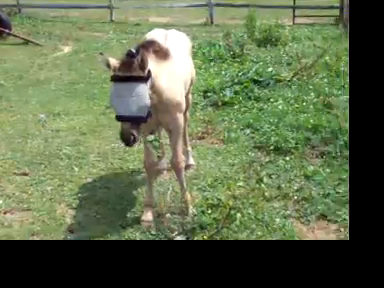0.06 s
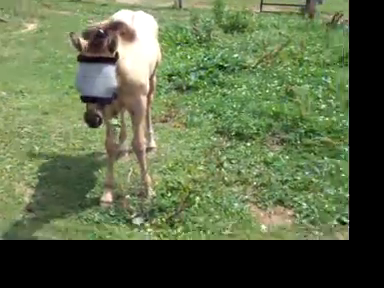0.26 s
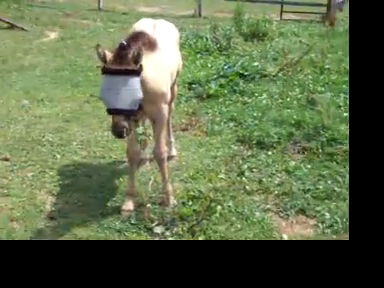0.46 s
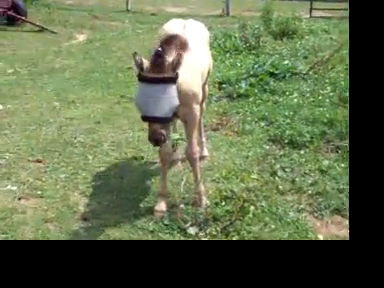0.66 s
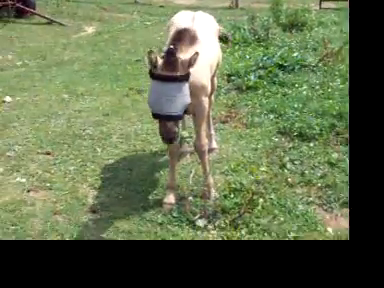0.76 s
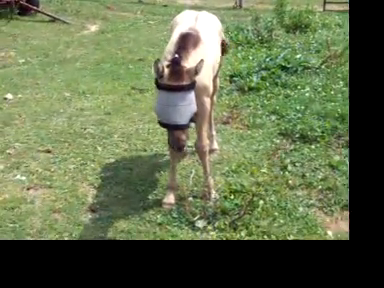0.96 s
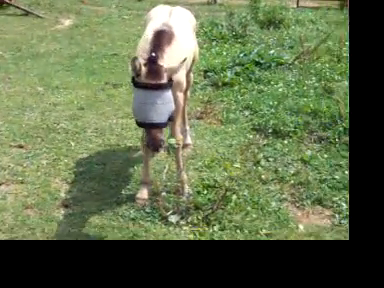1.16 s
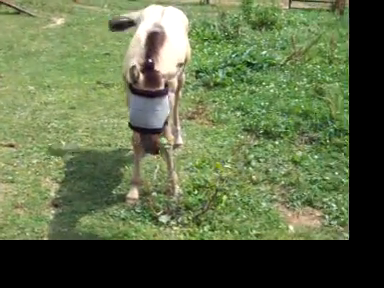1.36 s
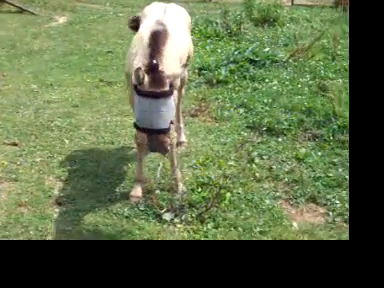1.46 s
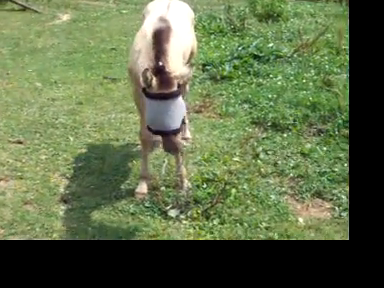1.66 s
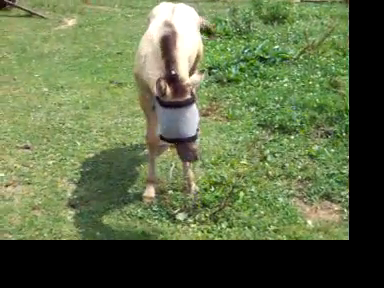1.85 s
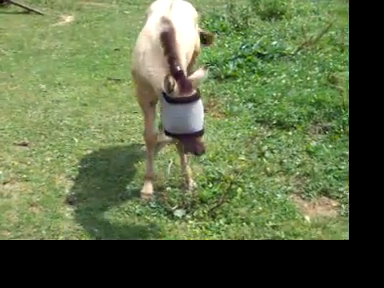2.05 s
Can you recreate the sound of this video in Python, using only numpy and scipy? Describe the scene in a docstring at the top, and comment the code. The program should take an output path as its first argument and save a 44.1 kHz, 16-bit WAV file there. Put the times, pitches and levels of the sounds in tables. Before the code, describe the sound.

Very close handling noise: light ticks, a rapid burst of hard knocks with a gritty rub, one isolated sharp knock. Then quiet open field, faint grass rustle, a twig-like snap and small distant bird chirps.

```python
"""A quiet pasture: air rumble and thin far hiss throughout, grass rustling faintly now and then.
First, light ticks on the microphone case and one short loud scrape among a burst of knocks.
Then a sharp knock and sparse lighter ticks; near the end three arched bird chirps around a dry snap.
Contacts ring damped modes; rubbing and rustles are coloured grains; chirps are gliding sines; air is noise."""
import sys
import numpy as np
from scipy import signal
from scipy.fft import rfft, irfft
from scipy.io import wavfile
from scipy.ndimage import uniform_filter1d

SR = 44100
rng = np.random.default_rng(int(sys.argv[2]) if len(sys.argv) > 2 else 0)


def dump(signal):
    """Clip the signal to [-1, 1] and save it as 16-bit WAV at the path in sys.argv[1]."""
    limited = np.clip(np.atleast_2d(signal).T, -1, 1)
    pcm = np.round(limited * 32767).astype(np.int16)
    wavfile.write(sys.argv[1], SR, pcm)


N = 92610
T = np.arange(N) / SR

# Contacts on the case: start_s, level_db, bass_db, top_db, slide_decay_s, lowpass_hz
CONTACTS = [(0.0518, -25.5, -6, 9.5, .0015, 8100), (0.152, -25, 3, -3, .0005, 4800),
            (0.154, -32, -2, -4, .0005, 4800), (0.2127, -27, 2, 3, .0006, 6500),
            (0.2360, -22, -1, 15, .001, 7150), (0.24, -17, -3.5, -1, 0.0013, 7500),
            (0.2425, -14, -7, -5, 0.0007, 7000), (0.2487, -13, 0, -6, .001, 3000),
            (0.2596, -22.5, 4, 11.5, .001, 7440), (0.2621, -25, 9, 0, .0007, 1000),
            (0.283, -36, -9, 10, .001, 7000), (0.3054, -30.5, -7, 17, .001, 8600),
            (0.311, -16.5, 0, 11.5, .0015, 6500), (0.3336, -16, -11.5, 8, .001, 7000),
            (0.3643, -15.5, 4, 11.5, .0007, 8000), (0.3714, -16.5, 5.5, 1.5, .001, 7060),
            (0.382, -27.5, 11, -5, .001, 4000), (0.567, -39, -3, -6, .002, 6000),
            (0.6232, -11, -5.5, 0, 0.00051, 5000), (0.645, -37.5, 5, 3, .003, 6500),
            (0.669, -32.5, -19, 11, .0005, 7050), (0.988, -41, 10.5, -3, .002, 6000),
            (1.4430, -26, -7, 5.5, .002, 7500), (1.6275, -32, -16, 8, .002, 3800)]
# Ringing modes of the case: mode_hz, mode_db, t60_s
CASE_MODES = [(390, -13.5, 0.0078), (673, -10.5, .014), (1154, -8, 0.015), (1967, -7.5, 0.0091),
              (2567, -8, 0.0097), (3260, -9.5, 0.0098), (4160, -2.5, 0.0079), (5075, -7, 0.0035),
              (6440, -13.5, 0.0051)]
BASS_BELOW_HZ, TOP_ABOVE_HZ, CONTACT_GRIT = 1500, 5000, 0.77

# Dull bumps of the body: start_s, pitch_hz, level_db, t60_s
BODY_BUMPS = [(0.153, 135, -39.5, 0.12), (0.263, 175, -38, .08), (0.3713, 125, -32.5, .11),
              (0.372, 260, -27.5, 0.026), (0.374, 50, -40, .15), (0.381, 817, -31, 0.063),
              (1.443, 400, -35.5, 0.032)]

# Rubbing level over time: time_s, low_band_db, high_band_db
RUB_LEVELS = [(0.225, -67, -65), (0.24, -42, -37), (0.255, -32, -32.5), (0.27, -43.5, -41.5),
              (0.303, -48, -39), (0.311, -27.5, -27), (0.322, -15, -16), (0.34, -23, -20.5),
              (0.361, -20, -19), (0.372, -27.5, -34.5), (0.388, -48, -58), (0.41, -70, -75)]
# Rubbing spectrum: freq_hz, relative_db
RUB_SPECTRUM = [(60, -10.5), (200, -9.5), (400, -5.5), (600, -1.5), (790, 1), (950, -7.5), (1100, 1),
                (1380, 2.5), (1600, -9.5), (2300, -1), (2650, 1.5), (2850, -4), (3300, 0), (3800, -5),
                (4100, -1.5), (5300, -8), (7000, -18), (8500, -35)]
RUB_SPLIT_HZ, SLIPS_PER_S, SLIP_SPREAD_DB, RUB_HISS = 1700, 5000, 2.5, 0.53
HOLLOW_HZ, HOLLOW_T60_S, HOLLOW_DB = 812, .08, -47.5

# Modes of the snap: mode_hz, mode_db, t60_s
SNAP_MODES = [(990, -3.5, 0.016), (2024, 0.5, 0.018), (2840, -5, 0.015), (3500, -8, 0.012),
              (4020, -2.5, 0.017), (6200, -26, 0.0097)]
SNAP_S, SNAP_DB, SNAP_LOWPASS_HZ = 1.8443, -23, 5000

# Bird chirps: peak_s, half_length_s, foot_hz, top_hz, arch_exponent (1 sharp, 2 round), level_db, fade
BIRD_CHIRPS = [(1.764, 0.038, 2850, 3686, 2.6, -47, .7), (1.861, .016, 4050, 6130, 0.8, -43, 0.88),
               (1.923, .016, 3750, 5250, 0.8, -39, 3.0)]
FALL_DB_PER_HALF_LENGTH, CHIRP_WAVER = -4, 0.0116   # waver: rms fraction of the pitch
ECHO_DB, ECHO_T60_S, ECHO_DELAY_S = -6, 0.39, .01

# Soft rustles: centre_s, half_length_s, level_db
RUSTLE_SWELLS = [(0.003, .02, -43), (0.06, 0.029, -38.5), (0.12, 0.034, -52), (0.463, 0.08, -50.5),
                 (0.74, 0.03, -55.5), (1.053, 0.062, -49.5), (1.183, 0.0075, -50), (1.957, 0.093, -51)]
# Rustle spectrum: freq_hz, relative_db
RUSTLE_SPECTRUM = [(200, -6), (800, -3.5), (1600, -6), (2600, 1), (4000, 4), (5400, 3), (7000, -4),
                   (8500, -17.5)]
RUSTLE_GRAINS_PER_S, RUSTLE_SPREAD_DB = 2500, 3

# Open-air spectrum: freq_hz, relative_db
AIR_SPECTRUM = [(12, -53.5), (20, -9.5), (54, 1.5), (92, 0), (127, 2.5), (294, -2.5), (410, -6), (584, -7),
                (1250, -13.5), (1530, -11.5), (2420, -17.5), (3450, -18), (3920, -19.5), (4680, -13),
                (5310, -20), (7970, -30), (8600, -58), (11200, -84.5), (18900, -120)]
AIR_DB = -45.5
# Far insects, before the swell: centre_hz, width_hz, level_db
INSECT_BANDS = [(4650, 180, -59.5), (1448, 220, -56.5)]
# Insect gain over time: time_s, gain_db
INSECT_GAIN = [(0, -11), (0.6, -10), (1.0, -4.5), (1.5, 1.5), (2.1, 1.5)]

OVERLOAD_PEAK, STOPBAND_HZ = .9, 9500


def from_db(db):
    """Decibels to gain."""
    return 10 ** (np.asarray(db) / 20)


def rms_one(x):
    """Scale to unit power."""
    return x / np.sqrt(np.mean(x ** 2) + 1e-20)


def level(points):
    """Gain over time from (time_s, level_db) points, linear in dB."""
    return from_db(np.interp(T, *np.transpose(points)))


def colour(x, points):
    """Shape a steady sound by (freq_hz, relative_db) points; unit power."""
    points_hz, points_db = np.transpose(points)
    bins_hz = np.arange(N // 2 + 1) * SR / N + 1
    bins_db = np.interp(np.log(bins_hz), np.log(points_hz), points_db)
    return rms_one(irfft(rfft(x) * from_db(bins_db), N))


def lowpass(x, order, cutoff_hz):
    """Causal Butterworth lowpass."""
    return signal.sosfilt(signal.butter(order, cutoff_hz, fs=SR, output="sos"), x)


def ring(x, mode_hz, t60_s):
    """Damped resonator: a unit click gives a decaying cosine that starts at 1."""
    decay = from_db(-60 / (t60_s * SR))
    turn = 2 * np.pi * mode_hz / SR
    zeros = [1, -decay * np.cos(turn)]
    poles = [1, -2 * decay * np.cos(turn), decay * decay]
    return signal.lfilter(zeros, poles, x + 1e-18)   # offset avoids denormals


def grains(per_s, spread_db):
    """Random clicks of uneven size and either sign; unit power."""
    sizes = from_db(spread_db * np.minimum(rng.exponential(1, N), 4))
    signs = rng.choice([-1, 1], N)
    return rms_one(sizes * signs * (rng.random(N) < per_s / SR))


def knocks():
    """Each contact, a click with a brief gritty slide, rings the case modes through its own lowpass."""
    age_s = np.arange(2048) / SR
    length = len(age_s)
    out = np.zeros(N + length)
    for start_s, level_db, bass_db, top_db, slide_decay_s, lowpass_hz in CONTACTS:
        blow = np.zeros(length)
        for k, (mode_hz, mode_db, t60_s) in enumerate(CASE_MODES):
            force = rng.standard_normal(length) * np.exp(-age_s / slide_decay_s)
            force *= CONTACT_GRIT / np.linalg.norm(force)
            force[0] += (-1) ** k   # click, alternating in sign from mode to mode
            tilt_db = bass_db * (mode_hz < BASS_BELOW_HZ) + top_db * (mode_hz > TOP_ABOVE_HZ)
            blow += from_db(level_db + mode_db + tilt_db) * ring(force, mode_hz, t60_s)
        start = int(start_s * SR)
        out[start:start + length] += lowpass(blow, 5, lowpass_hz)
    return signal.sosfilt(signal.butter(2, 200, "high", fs=SR, output="sos"), out[:N])


def scrape():
    """Dense stick-slip grains and hiss against the case, which excite its ringing hollow."""
    slips = grains(SLIPS_PER_S, SLIP_SPREAD_DB) + RUB_HISS * rng.standard_normal(N)
    slips = colour(slips, RUB_SPECTRUM)
    split = signal.butter(4, RUB_SPLIT_HZ, fs=SR, output="sos")
    low_band = signal.sosfiltfilt(split, slips)
    high_band = slips - low_band
    low_gain = level([(time_s, low_db) for time_s, low_db, _ in RUB_LEVELS])
    high_gain = level([(time_s, high_db) for time_s, _, high_db in RUB_LEVELS])
    rub = low_gain * low_band + high_gain * high_band
    return rub + from_db(HOLLOW_DB) * ring(rub, HOLLOW_HZ, HOLLOW_T60_S)


def bumps():
    """Low, quickly damped sine swings of the body."""
    out = np.zeros(N)
    for start_s, pitch_hz, level_db, t60_s in BODY_BUMPS:
        age_s = np.maximum(T - start_s, 0)
        out += from_db(level_db - 60 * age_s / t60_s) * np.sin(2 * np.pi * pitch_hz * age_s)
    return out


def snap():
    """A dry snap, as of a twig: one click into a few short modes."""
    click = np.zeros(N)
    click[int(SNAP_S * SR)] = from_db(SNAP_DB)
    modes = np.zeros(N)
    for k, (mode_hz, mode_db, t60_s) in enumerate(SNAP_MODES):
        modes += (-1) ** k * from_db(mode_db) * ring(click, mode_hz, t60_s)
    return lowpass(modes, 2, SNAP_LOWPASS_HZ)


def bird():
    """Whistles that rise and fall, loudest at the top, with a scattered echo of decaying noise."""
    out = np.zeros(N)
    for peak_s, half_s, foot_hz, top_hz, arch, level_db, fade in BIRD_CHIRPS:
        away = np.minimum(np.abs(T - peak_s) / half_s, 2)   # 0 at the peak, 1 at the feet
        waver = 1 + CHIRP_WAVER * rms_one(uniform_filter1d(rng.standard_normal(N), size=80))
        pitch_hz = (top_hz - (top_hz - foot_hz) * away ** arch) * waver
        gain = from_db(level_db + FALL_DB_PER_HALF_LENGTH * away * (T > peak_s))
        gain *= np.exp(-fade * away ** 2)
        gain *= np.clip((1.3 - away) * 4, 0, 1)   # fades out just past the feet, silent from 1.3 half-lengths
        out += np.sqrt(2) * gain * np.sin(2 * np.pi * np.cumsum(pitch_hz) / SR)
    echo = rng.standard_normal(N) * from_db(-60 * T / ECHO_T60_S) * (T > ECHO_DELAY_S)
    echo /= np.linalg.norm(echo)
    return out + from_db(ECHO_DB) * signal.fftconvolve(out, echo)[:N]


def rustles():
    """Soft swells of fine crackle."""
    swell = np.zeros(N)
    for centre_s, half_s, level_db in RUSTLE_SWELLS:
        swell += from_db(level_db) * np.exp(-((T - centre_s) / half_s) ** 2)
    return swell * colour(grains(RUSTLE_GRAINS_PER_S, RUSTLE_SPREAD_DB), RUSTLE_SPECTRUM)


def field():
    """Open-air rumble and hiss as coloured noise, far insects as noise through narrow resonators."""
    air = from_db(AIR_DB) * colour(rng.standard_normal(N), AIR_SPECTRUM)
    insects = np.zeros(N)
    for centre_hz, width_hz, level_db in INSECT_BANDS:
        t60_s = np.log(1000) / (np.pi * width_hz)   # bandwidth to decay time
        insects += from_db(level_db) * rms_one(ring(rng.standard_normal(N), centre_hz, t60_s))
    return air + level(INSECT_GAIN) * insects


def scene():
    """Sum of all sources at one microphone."""
    contact = knocks() + scrape() + bumps()
    return (contact + snap() + bird() + rustles() + field())[None]


def record(dry):
    """Round the peaks by tanh, then cut the top steeply."""
    rounded = OVERLOAD_PEAK * np.tanh(dry / OVERLOAD_PEAK)
    return signal.sosfilt(signal.cheby2(16, 70, STOPBAND_HZ, fs=SR, output="sos"), rounded)


dry = scene()
out = record(dry)
dump(out)
```